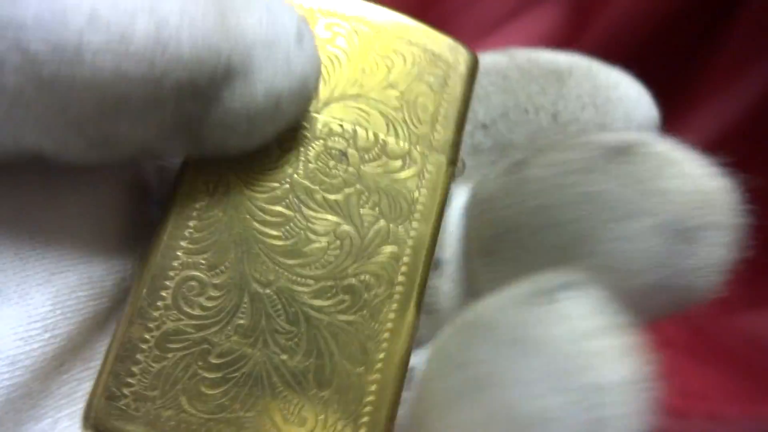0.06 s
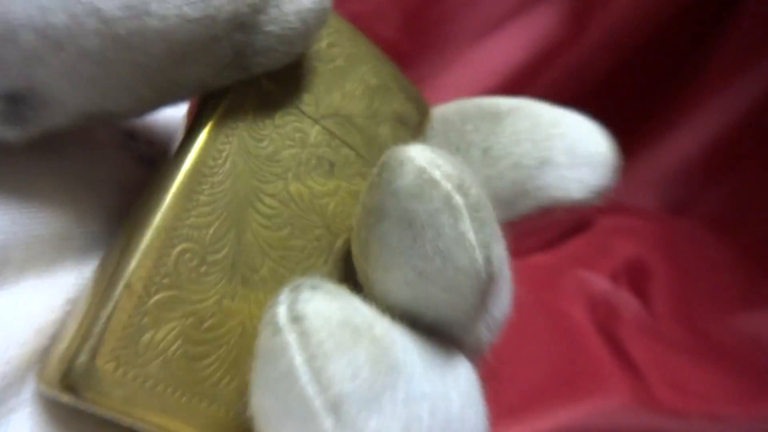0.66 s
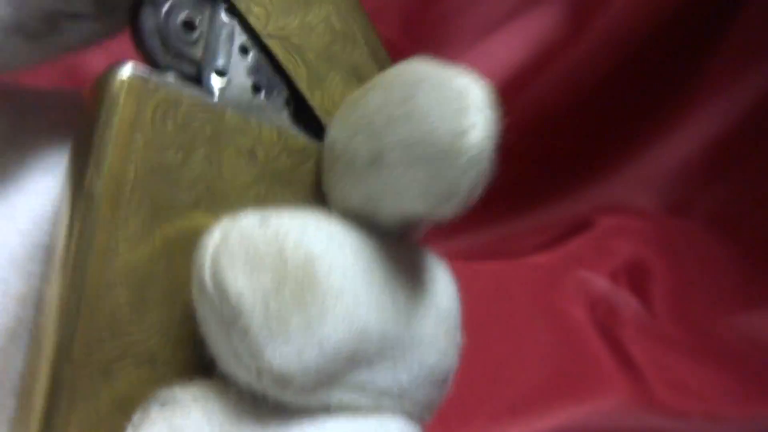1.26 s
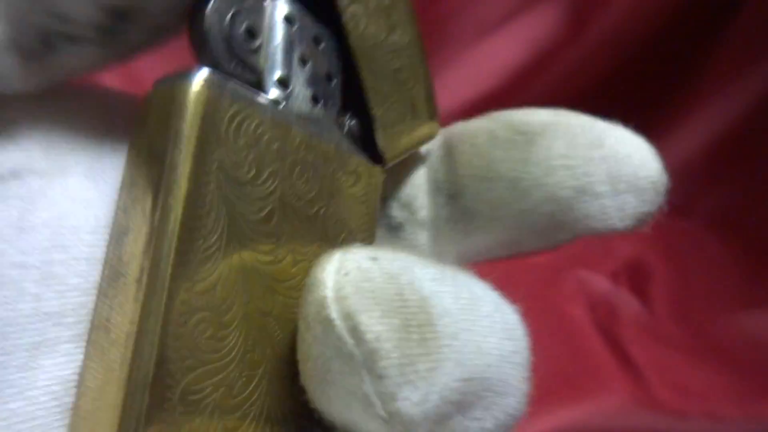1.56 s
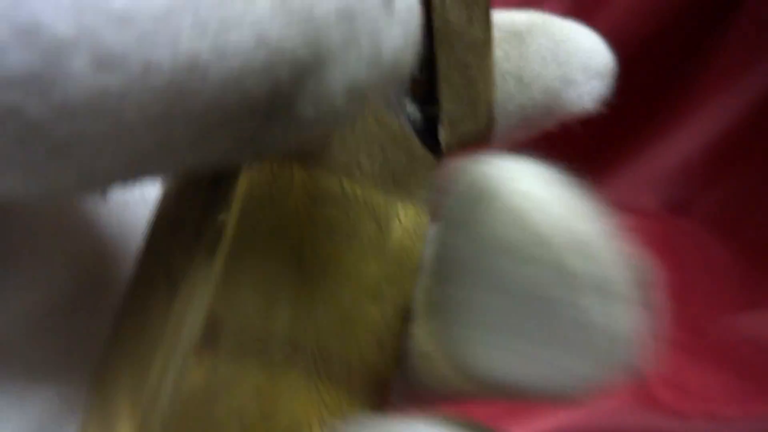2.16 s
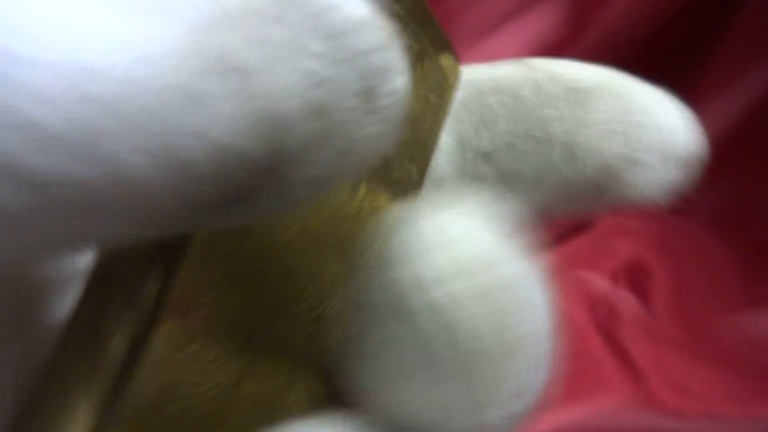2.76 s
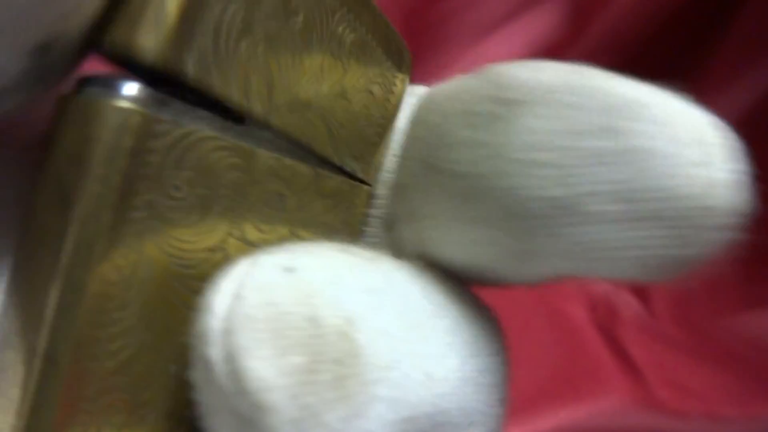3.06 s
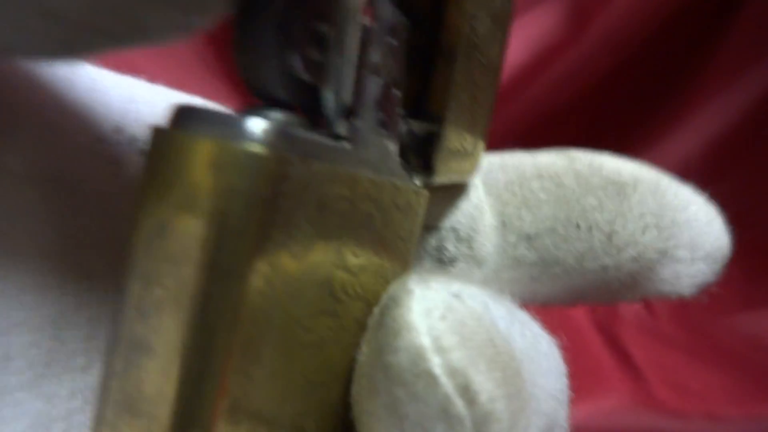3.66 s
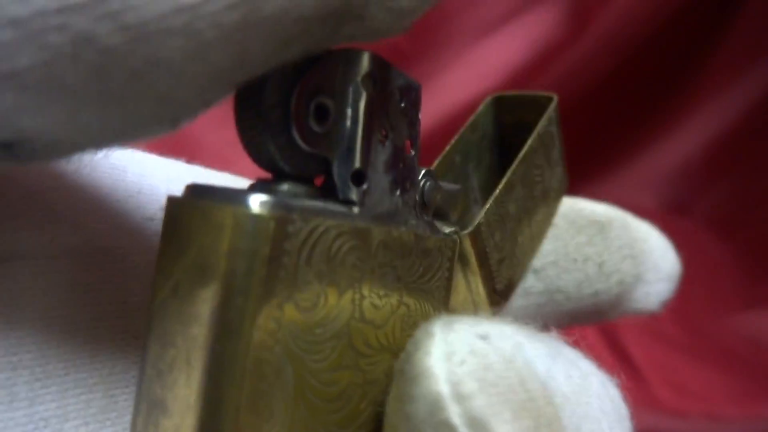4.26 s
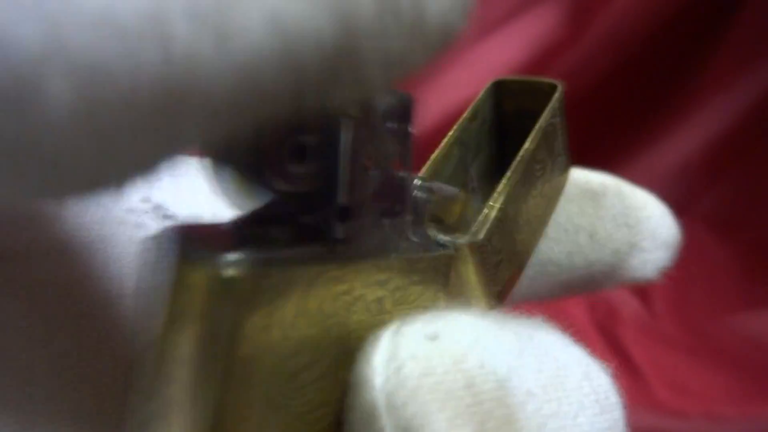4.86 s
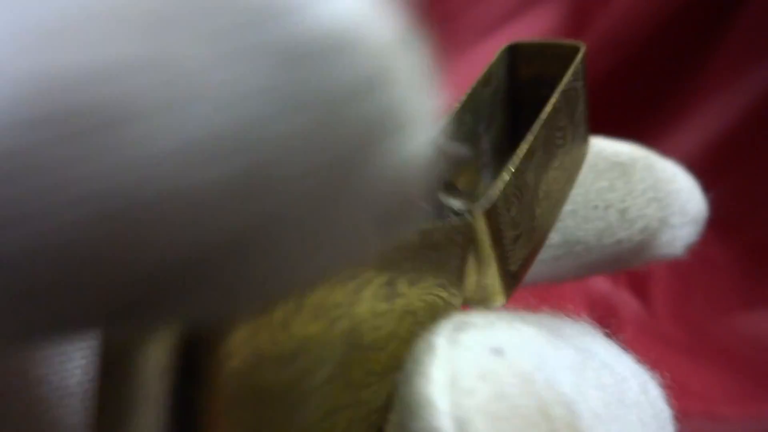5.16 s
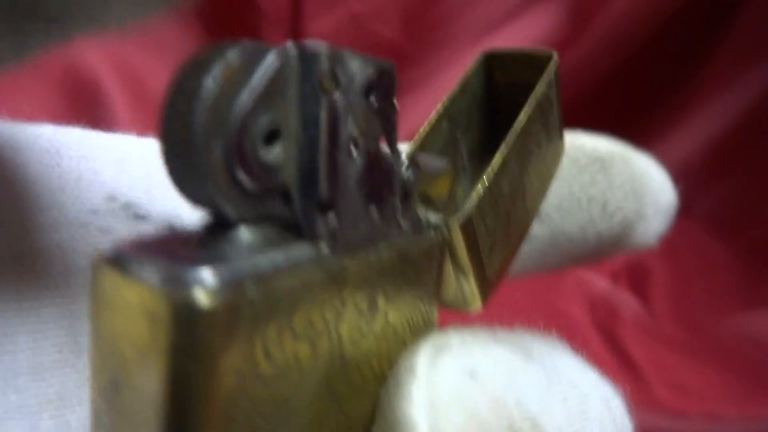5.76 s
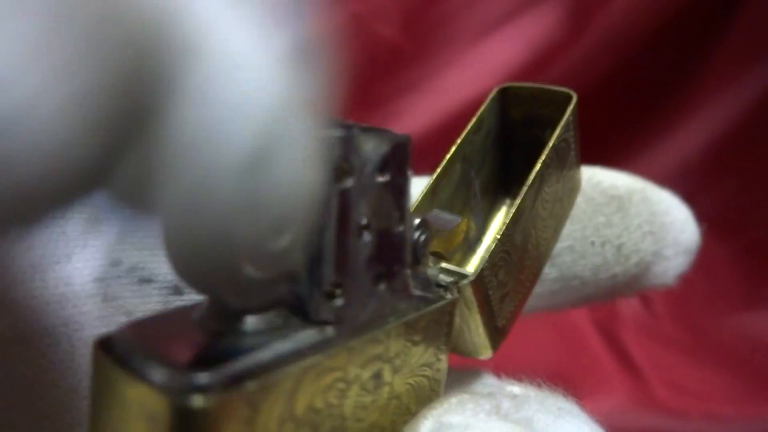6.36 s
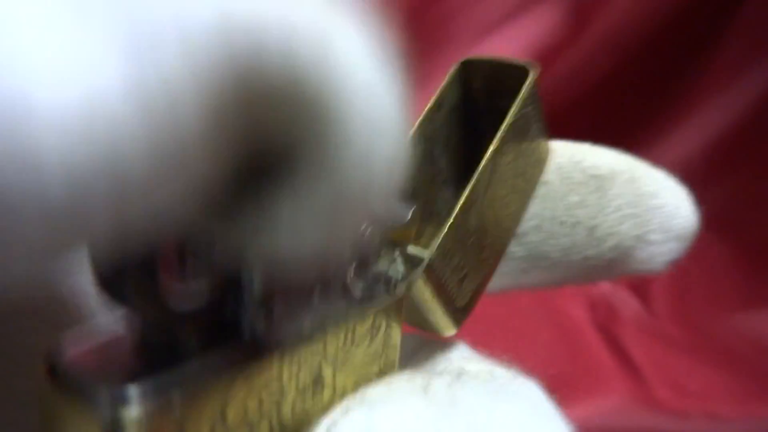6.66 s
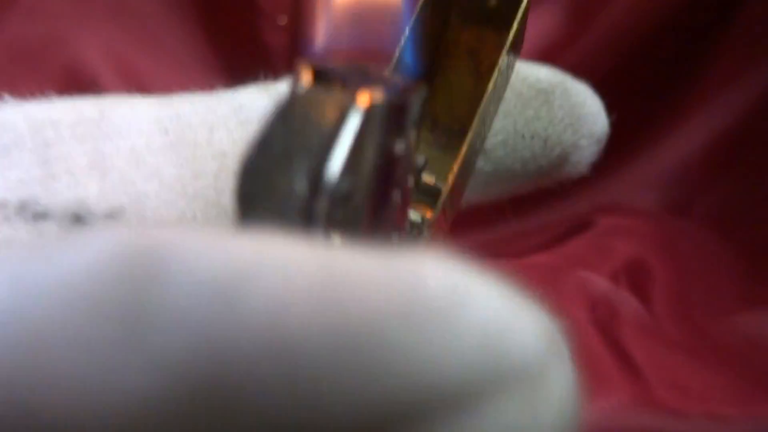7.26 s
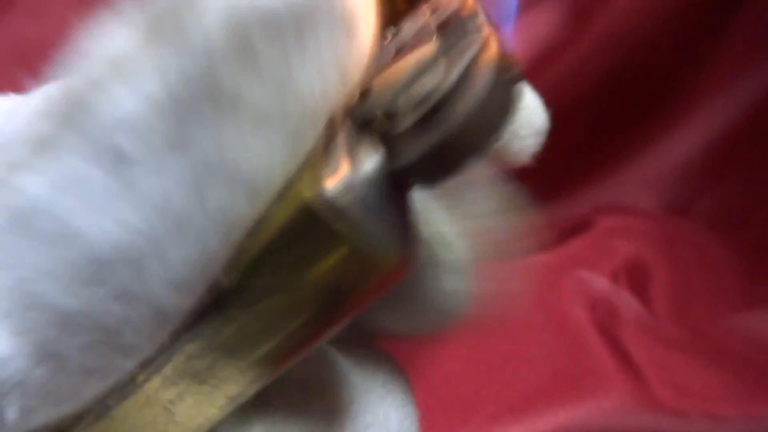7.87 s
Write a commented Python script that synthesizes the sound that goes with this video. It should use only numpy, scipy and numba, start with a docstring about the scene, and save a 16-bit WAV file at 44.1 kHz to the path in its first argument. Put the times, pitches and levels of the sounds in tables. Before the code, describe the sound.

In a small, quiet room, a metal lighter is handled a hand's width from the microphone. Its lid opens with a sharp ringing click, shuts with a hard snap and opens once more, among small ticks and soft glove rubbing. Two short scrapes of the flint wheel follow, the second with a brief sizzle and puff as the flame catches. Fingers bump the case to the end, with a faint distant motor underneath.

```python
"""A brass flip lighter in gloved hands, a hand's width from the microphone in a small, quiet room.
Cotton brushes the case and the hinge squeaks; at 1.3 s the cam throws the lid open with a clink.
The lid snaps shut at 2.4 s, opens again at 3.2 s and squeaks on its pin. The limiter ducks each loud
snap, so ring and room swell up just after it. The flint wheel rasps at 4.9 s and again at 6.8 s, when
the wick lights with a puff. Fingers bump the case to the end, over room air and a distant motor."""
import sys
import numpy as np
from scipy import signal
from scipy.fft import rfft, irfft, next_fast_len
from scipy.io import wavfile
from scipy.ndimage import uniform_filter1d, minimum_filter1d
from numba import njit

SR = 44100
rng = np.random.default_rng(int(sys.argv[2]) if len(sys.argv) > 2 else 0)


def transcribe(u):
    """Save the signal u as a 16-bit wav file named by the first command-line argument.

    u: samples, shape (n,) or (channels, n), limited to [-1, 1]; the rate is SR.
    q: integer samples, one column per channel.
    """
    v = np.clip(np.atleast_2d(u).T, -1, 1)
    q = np.round(v * 32767).astype(np.int16)
    wavfile.write(sys.argv[1], SR, q)


N = 357651
TIME = np.arange(N) / SR
AGE = np.arange(SR // 3) / SR  # seconds since a blow

# The cam throws the lid open. Each row: start in seconds, level in dB, ring time as a share of the
# free lid's, hinge drag in dB.
LID_FLIPS = [(1.3156, -3, 0.63, -62), (3.215, -2.5, 0.46, -48)]
# The held lid taps cam or case. Each row: start in seconds, slap in dB, bright crack in dB.
LID_TAPS = [(.201, -41, -62), (1.0532, -33, -60), (1.3556, -25.5, -38), (2.369, -47, -35),
            (3.355, -39.5, -34)]
# Modes of the brass lid. Each row: frequency in Hz, level in dB, undamped t60 in seconds.
LID_MODES = [(1915, -19, .13), (4720, -28, .1), (6426, 0, .22), (7161, -9, .19), (9297, -21, .05),
             (10138, 4, .085), (10640, -16, .1), (14014, -4, .085), (15260, -17, .07)]
# Modes of lid and case shut as one shell. Each row: frequency in Hz, level in dB, undamped t60 in seconds.
SHELL_MODES = [(1960, 8, 0.09), (2010, 3, 0.24), (2380, 1.5, .18), (3320, -10, 0.094), (3880, -18, 0.053),
               (4300, 3, 0.1), (5640, -6, 0.14), (7200, 3, 0.21), (10070, 13, 0.17), (10300, -7, 0.15),
               (10400, -14, .16), (11500, -9, .16), (12500, -13, .16), (12750, 0.5, 0.18), (14900, 3, 0.28)]
# Noise colours of the contacts. Each row: frequency in Hz, level in dB.
CAM_COLOUR = [(1500, -36), (3000, -21), (5400, -27), (8500, -13.5), (11500, -11), (13000, 1.5),
              (15400, 1.5), (15900, -7.5)]  # the cam's thin crack
CRACK_COLOUR = [(1200, -32), (2900, -16), (4000, -24), (5400, -22), (7000, -13), (8500, -13), (10500, -2),
                (11500, -8), (13000, 1), (15200, -1), (15900, -8)]  # a hard contact
SLAP_COLOUR = [(1200, -34), (1650, -3), (2000, -2), (2300, -4), (3400, -3.5), (4200, -5.5), (5200, -9),
               (7000, -1.5), (8500, -13), (15000, 1)]  # the two rims meeting
CLICK_COLOUR = [(300, -15), (1200, 8), (3000, -2), (5500, -11), (9000, -5), (14000, -9), (15900, 9)]  # a light click
RASP_COLOUR = [(40, -13), (170, -1), (450, -4), (1000, -19), (2500, -19), (3600, 6), (4500, -0.5),
               (5600, 2.5), (7000, -2), (10000, 1), (14500, 6.5), (16000, -0.5)]  # scraping metal
GLOVE_COLOUR = [(1470, -12), (2500, 0), (3660, -4.5), (4110, -2), (13100, 3), (16000, 3.5)]  # cotton on brass
# The thumb spins the flint wheel. Each row: peak in seconds, level in dB.
WHEEL_SPINS = [(4.9255, -16), (6.8125, -25)]
# The wick's first puff. Each row: frequency in Hz, level in dB, t60 in seconds.
PUFF_TONES = [(217, -23, 0.033), (805, -17.5, 0.0058)]
# The lid knocks in its loose hinge. Each row: start in seconds, knock in dB, bright click in dB.
HINGE_TICKS = [(0.9313, -25.5, -31), (.956, -37, -60), (1.0535, -29.5, -55), (1.357, -26.5, -31),
               (1.9083, -38, -25.5), (2.369, -37, -55), (2.9703, -41.5, -59.5), (3.039, -38, -55),
               (3.063, -26.5, -58), (4.1587, -31, -26), (6.4088, -38, -36), (8.0566, -40, -18.5)]
# Insert and wheel click, muffled by the hand. Each row: start in seconds, knock in dB, its pitch in Hz,
# bright click in dB.
INSERT_CLICKS = [(.9303, -25, 2500, -45), (1.357, -15, 2820, -32), (4.156, -14.5, 3300, -35),
                 (4.583, -24, 3280, -24.5), (6.6739, -27, 2400, -50), (6.8204, -21, 2500, -13),
                 (6.9112, -42, 4000, -30), (7.011, -50, 4000, -32), (7.047, -36, 4800, -29),
                 (7.515, -20.5, 1360, -36), (7.6133, -22, 1550, -27.5)]
# Metal slides lightly on metal. Each row: peak in seconds, seconds to rise 20 dB, level in dB.
METAL_SLIDES = [(.63, .09, -55), (1.68, 0.023, -45), (3.067, .035, -43), (4.156, 0.0085, -30),
                (4.913, 0.025, -39), (6.421, 0.032, -39.5)]
# The hinge squeaks, one list a stroke. Each row: time in seconds, base pitch in Hz, level in dB.
SQUEAK_STROKES = [
    [(.24, 7200, -69), (.34, 6900, -65), (.41, 5930, -64)],
    [(.45, 6860, -66), (.54, 6470, -74), (.58, 6200, -80)],
    [(3.57, 6450, -69), (3.66, 7050, -67), (3.84, 7440, -64), (3.89, 6430, -63), (4.0, 6320, -63),
     (4.13, 5800, -65), (4.28, 5100, -70)],
]
# The pin squeals in several strands. Each row: multiple of the base pitch, level in dB.
SQUEAK_STRANDS = [(.84, -13), (1, -4), (1.76, -8), (2, -5)]
# Fingers bump the case. Each row: start in seconds, level in dB, pitch in Hz.
FINGER_BUMPS = [(1.357, -36, 304), (7.13, -35.5, 167), (7.29, -39, 197), (7.517, -34.5, 235),
                (7.544, -27.5, 607), (7.631, -26.5, 620), (7.734, -33.5, 283), (7.768, -32.5, 180),
                (7.972, -32, 370), (7.97, -37, 119)]
# Gloves brush the brass. Each row: middle in seconds, half length in seconds, level in dB.
GLOVE_RUBS = [(.166, .04, -56), (.628, 0.22, -62), (1.01, 0.051, -54), (1.28, 0.071, -53.5),
              (1.566, .16, -56.5), (1.992, .1, -57.5), (2.314, 0.032, -59), (2.857, 0.082, -55.5),
              (3.293, 0.14, -54.5), (6.37, 0.056, -60), (7.704, 0.14, -54), (7.88, 0.017, -48),
              (8.1, 0.095, -54)]
# The small room's decay. Each row: frequency in Hz, t60 in seconds.
ROOM_DECAY = [(200, 0.094), (1900, 0.3), (4000, 0.23), (10000, 0.22), (15000, 0.18)]
# Steady room air and microphone hiss. Each row: frequency in Hz, level in dB.
AIR_COLOUR = [(25, -2.5), (80, 0), (130, -3), (180, -2.5), (245, 1.5), (330, -7.5), (450, -8), (600, -3.5),
              (950, -6.5), (1600, -6), (2200, -9), (2800, -12), (6000, -20.5), (16000, -22.5)]
# How alike the air is at the two microphone ports. Each row: frequency in Hz, left-right correlation.
AIR_LIKENESS = [(60, 0.97), (130, 0.84), (290, 0.38), (640, -0.34), (1410, -0.43), (3100, -0.11),
                (6820, 0.65), (15000, 0.96)]
# Whirring resonances in the air. Each row: centre in Hz, width in Hz, lift in dB.
WHIRR_PEAKS = [(1292.5, 150, 12), (1862, 278, 11)]
# A distant motor. Each row: frequency in Hz, level in dB, unsteadiness as a share of the amplitude.
MOTOR_HUM = [(46.2, -62, 0.13), (87.7, -72.5, 0.64), (122.4, -69.5, 0.6)]

SLAM_S, TRIP_LEAD_S = 2.4102, 0.0023  # the lid meets the case; the cam trips just before
LIGHT_S = 6.8128  # the wick catches
STOP_LAG_S = 0.0028  # from the peak of a spin to the wheel's stop
BRASS_KNOCK_T60 = 0.02535  # seconds


def snaps(trip_db=2.5, slam_db=-2, stop_db=-20):
    """Cam, rims and stopping wheel crack and slap, and the struck lid sings on. Returns blows and song."""
    def crack(db, colour=CRACK_COLOUR):
        return burst(db, colour, t60=0.0057)

    def slap(db):
        return burst(db, SLAP_COLOUR, t60=0.028)

    def sing(db, damping):
        return amp(db) * ring(LID_MODES, damping, scatter_db=2) * onset(0.0011)

    blows, song = np.zeros(N), np.zeros(N)
    for s, db, damping, _ in LID_FLIPS:
        add(blows, s, crack(db + 2, CAM_COLOUR) + slap(db - 17))
        add(song, s, sing(db - 5.5, damping))
    add(blows, SLAM_S - TRIP_LEAD_S, crack(trip_db))
    add(blows, SLAM_S, crack(slam_db) + slap(db=0))
    add(song, SLAM_S, sing(db=-10.5, damping=0.38))
    for s, db, crack_db in LID_TAPS:
        add(blows, s, crack(crack_db) + slap(db))
        add(song, s, sing(db - 3, damping=0.18))  # the fingers shorten the ring
    for s, _ in WHEEL_SPINS:
        add(blows, s + STOP_LAG_S, crack(stop_db) + slap(stop_db - 8))
    return radiated(blows), radiated(song)


def shell(ring_db=-20, knock_db=-7):
    """The slam knocks the case and sets it ringing in many weak modes."""
    out = np.zeros(N)
    ringing = amp(ring_db) * ring(SHELL_MODES, damping=0.46, scatter_db=5)
    body = amp(knock_db) * knock(hz=2080, t60=BRASS_KNOCK_T60, spread=0.55, flank_db=-4)
    add(out, SLAM_S, ringing + body)
    return radiated(out)


def flint_wheel():
    """The wheel's teeth grind the flint in one short rasp a spin."""
    return sum(scrape(s, db, rise_s=0.012, fall_s=0.0069, hz=3570, chatter_db=-8, treble_db=-2, rate=1100)
               for s, db in WHEEL_SPINS)


def sparks(db=-16.5, rise_s=0.0095, fall_s=0.007, grain_db=3):
    """Burning specks of flint: a short, very bright sizzle as the wick catches."""
    flare = amp(db) * swell(TIME - LIGHT_S, rise_s, fall_s)
    return flare * unit(noise(CRACK_COLOUR, N) * amp(grain_db * wobble(1500)))


def flame(puffs=3, gap_s=0.012, loss_db=2, pitch_ratio=0.7):
    """The vapour catches in a few quick puffs, each weaker and lower than the last."""
    out = np.zeros(N)
    for k in range(puffs):
        for hz, db, t60 in PUFF_TONES:
            add(out, LIGHT_S + k * gap_s, amp(db - k * loss_db) * thump(hz * pitch_ratio ** k, t60))
    return out


def ticks(lid_hz=1934, gripped_t60=0.00312, insert_db=-37):
    """Each light contact is a click and a knock: the lid rings briefly, the gripped insert hardly at all."""
    out = np.zeros(N)
    contacts = [(s, db, lid_hz, click_db, BRASS_KNOCK_T60) for s, db, click_db in HINGE_TICKS]
    contacts += [(*row, gripped_t60) for row in INSERT_CLICKS]
    for s, db, hz, click_db, t60 in contacts:
        add(out, s, amp(db) * knock(hz, t60) + burst(click_db, CLICK_COLOUR, t60=0.0059))
    for s, _ in WHEEL_SPINS:  # the insert rings on after the wheel stops
        add(out, s + STOP_LAG_S, amp(insert_db) * knock(hz=2490, t60=0.078))
    return radiated(out, corner_hz=1410)


def slides():
    """Metal slides on metal and the case chatters; the light pressure dulls the treble."""
    return sum(scrape(s, db, rise_s, fall_s=0.57 * rise_s, hz=2160, chatter_db=0, treble_db=-7.5, rate=700)
               for s, rise_s, db in METAL_SLIDES)


def hinge_drag(closing_db=-46.5, lead_s=0.0046):
    """The hinge drags ever harder until the cam lets go."""
    releases = [(s, db) for s, _, _, db in LID_FLIPS] + [(SLAM_S - TRIP_LEAD_S, closing_db)]
    return sum(scrape(s - lead_s, db, rise_s=0.084, fall_s=0.0055, hz=2630,
                      chatter_db=1, treble_db=0, rate=1200) for s, db in releases)


def hinge_squeak(flutter_db=5):
    """Fast stick-slip at the pin: thin, rough strands that come and go, each on its own."""
    out = np.zeros(N)
    for multiple, strand_db in SQUEAK_STRANDS:
        ratio = multiple * (1 + 0.012 * wobble(700) + 0.008 * wobble(25))
        flutter = flutter_db * wobble(40)
        for stroke in SQUEAK_STROKES:
            s, hz, db = np.transpose(stroke)
            on = (TIME > s[0]) & (TIME < s[-1])
            phase = 2 * np.pi * np.cumsum(np.interp(TIME[on], s, hz) * ratio[on]) / SR
            out[on] += amp(np.interp(TIME[on], s, db) + strand_db + flutter[on]) * np.sin(phase)
    return out


def bumps(thumb_db=-29, thumb_hz=300, decay_cycles=5.54):
    """Fingers bump the case, and the thumb lands on it with every spin."""
    out = np.zeros(N)
    for s, db, hz in FINGER_BUMPS + [(s, thumb_db, thumb_hz) for s, _ in WHEEL_SPINS]:
        add(out, s, amp(db) * thump(hz, t60=decay_cycles / hz))
    return out


def gloves(grain_db=1):
    """Fibres drag over the engraving in short grainy swells and stir a high mode of the lid."""
    strokes = sum(amp(db) * np.exp(-((TIME - s) / half) ** 2 / 2) for s, half, db in GLOVE_RUBS)
    fibres = noise(GLOVE_COLOUR, N)
    brush = filtered(fibres, lambda hz: amp(resonance_db(hz, centre=10200, width=500, db=4)))
    return strokes * unit(brush * amp(grain_db * wobble(400)))


def scrape(s, db, rise_s, fall_s, hz, chatter_db, treble_db, rate, uneven_db=3):
    """Teeth catch and slip about rate times a second: each slip spits noise and jolts the case."""
    out, size = np.zeros(N), len(AGE)
    pace = rate / SR * amp(uneven_db * noise([(100, 1.5), (600, -41.5)], size))
    teeth_passed = np.floor(np.cumsum(pace))
    slips = np.diff(teeth_passed, prepend=0) * amp(uneven_db * rng.standard_normal(size))
    spits = unit(signal.fftconvolve(slips, fade(t60=0.0016))[:size])
    rasp = unit((1 + spits) * noise(RASP_COLOUR, size))  # smooth friction plus the slips
    rasp = filtered(rasp, lambda f: amp(along([(8000, 0), (14000, treble_db)], f)))
    chatter = unit(signal.fftconvolve(slips, knock(hz, t60=0.003445))[:size])
    pressure = swell(AGE - AGE.mean(), rise_s, fall_s)
    add(out, s - AGE.mean(), amp(db) * pressure * (rasp + amp(chatter_db) * chatter))
    return out


def knock(hz, t60, spread=0.2, flank_db=-6):
    """The hand-damped case: a main mode between two weaker, quicker ones."""
    modes = [(hz, 0, t60),
             (hz * (1 + spread), flank_db, t60 / 2),
             (hz / (1 + spread), flank_db - 0.5, t60 / 2)]
    return ring(modes, damping=1, scatter_db=1.5) * onset(0.00019)


def ring(modes, damping, scatter_db):
    """Struck modes, each at a slightly new strength and its own phase; damping multiplies every t60."""
    chance = rng.standard_normal((len(modes), 2))
    return sum(amp(db + scatter_db * luck) * fade(t60 * damping) * np.sin(2 * np.pi * (hz * AGE + phase))
               for (hz, db, t60), (luck, phase) in zip(modes, chance))


def burst(db, colour, t60):
    """A contact's coloured noise, dying at once."""
    return amp(db) * fade(t60) * noise(colour, len(AGE))


def thump(hz, t60):
    """A low push that dies within a few cycles."""
    return np.sin(2 * np.pi * hz * AGE) * fade(t60) * onset(0.00029)


def radiated(x, corner_hz=1500):
    """A body as small as the lighter radiates little bass."""
    return signal.sosfilt(signal.butter(4, corner_hz, "highpass", fs=SR, output="sos"), x)


def room(x, side_db=-14.5, delay_s=0.0034, build_s=0.0011):
    """The near walls answer after a few milliseconds, almost alike at the microphone's two close ports."""
    hz, t, spectra = signal.stft(rng.standard_normal((2, len(AGE))), SR, nperseg=256)
    decay = np.exp(-np.log(1000) * t / along(ROOM_DECAY, hz)[:, None])
    tail = signal.istft(spectra * decay, SR, nperseg=256)[1][:, :len(AGE)]
    tail *= 1 - np.exp(-np.maximum(AGE - delay_s, 0) / build_s)
    mid, side = signal.fftconvolve(x[None], tail / np.linalg.norm(tail[0]), axes=1)[:, :N]
    return np.array([mid + amp(side_db) * side, mid - amp(side_db) * side])


def room_air(db=-52):
    """Room tone and microphone hiss with two whirring resonances."""
    def mid_and_side(hz):
        angle = np.arccos(np.clip(along(AIR_LIKENESS, hz), -1, 1)) / 2
        whirr_db = sum(resonance_db(hz, *peak) for peak in WHIRR_PEAKS)
        return amp(along(AIR_COLOUR, hz) + whirr_db) * np.array([np.cos(angle), np.sin(angle)])

    mid, side = filtered(rng.standard_normal((2, N)), mid_and_side)
    return amp(db) * unit(np.array([mid + side, mid - side]))


def motor():
    """A motor hums far off, each tone wandering in level and phase."""
    out = np.zeros(N)
    for hz, db, drift in MOTOR_HUM:
        wander = 1 + drift * (wobble(8.4) + 1j * wobble(5.2))
        out += amp(db) * np.sqrt(2) * (wander * np.exp(2j * np.pi * hz * TIME)).real
    return out


def amp(db):
    """Decibels to gain."""
    return 10 ** (np.asarray(db) / 20)


def unit(x):
    """x at rms 1."""
    return x / np.sqrt(np.mean(x ** 2) + 1e-20)


def onset(attack_s):
    """A rise from 0 to 1 with time constant attack_s."""
    return 1 - np.exp(-AGE / attack_s)


def fade(t60):
    """A decay that loses 60 dB in t60 seconds."""
    return np.exp(-np.log(1000) * AGE / max(t60, 1e-4))


def swell(t, rise_s, fall_s):
    """A peak at t = 0: up 20 dB every rise_s, then down 20 dB every fall_s."""
    return amp(-20 * np.maximum(-t / rise_s, t / fall_s))


def resonance_db(hz, centre, width, db):
    """A bell-shaped lift; centre and width in Hz."""
    return db / (1 + (2 * (hz - centre) / width) ** 2)


def along(points, hz):
    """(Hz, value) points read on a log axis."""
    freqs, values = np.transpose(points)
    return np.interp(np.log(hz + 1), np.log(freqs + 1), values)


def filtered(x, response):
    """x through a gain that depends on frequency."""
    size = x.shape[-1]
    padded = next_fast_len(size + 8192)
    return irfft(rfft(x, padded) * response(np.fft.rfftfreq(padded, 1 / SR)), padded)[..., :size]


def noise(colour, size):
    """Noise of rms 1 with a (Hz, dB) colour."""
    return unit(filtered(rng.standard_normal(size), lambda hz: amp(along(colour, hz))))


def wobble(rate):
    """A smooth random curve, rate knots a second."""
    curve = signal.resample_poly(rng.standard_normal(int(N * rate / SR) + 4), 8, 1)
    return np.interp(TIME * rate * 8, np.arange(len(curve)), curve)


def add(track, s, sound):
    """Mix a sound into a track from s seconds on."""
    part = track[max(round(s * SR), 0):][:len(sound)]
    part += sound[:len(part)]


@njit
def gain_reduction(excess, attack, release):
    """Ducking in dB: rises quickly towards the excess, falls back at a steady pace."""
    out, held = np.zeros(len(excess)), 0.0
    for i in range(len(excess)):
        if excess[i] > held:
            held += attack * (excess[i] - held)
        else:
            held = max(held - release, 0.0)
        out[i] = held
    return out


def scene(blow_room_db=-7, song_room_db=-23, muffled_room_db=-20):
    """The lighter is a hand's width from the microphone, slightly to the left, with the room behind it."""
    blows, song = snaps()
    muffled = slides() + hinge_drag() + flint_wheel() + sparks() + ticks()
    direct = blows + song + shell() + muffled + bumps() + flame() + gloves() + hinge_squeak()
    walls = room(amp(blow_room_db) * blows + amp(song_room_db) * song + amp(muffled_room_db) * muffled)
    lean_left = amp([[0.3], [-0.3]])
    return (direct + walls) * lean_left + room_air() + motor()


def record(dry, threshold_db=-13, attack_s=0.00027, release_db_per_s=400, ceiling=0.53, top_hz=16100):
    """Gain control ducks the snaps, a look-ahead limiter catches their spikes, the band ends steeply."""
    excess_db = 20 * np.log10(np.abs(dry).max(axis=0) + 1e-9) - threshold_db
    attack = 1 - np.exp(-1 / (attack_s * SR))
    ducked = dry * amp(-gain_reduction(excess_db, attack, release_db_per_s / SR))
    safe_gain = ceiling / np.maximum(np.abs(ducked).max(axis=0), ceiling)
    window = SR // 1000  # one millisecond
    limited = ducked * uniform_filter1d(minimum_filter1d(safe_gain, size=window), size=window)
    return filtered(limited, lambda hz: np.clip((top_hz - hz) / 400, 0, 1))


dry = scene()
out = record(dry)
transcribe(out)
```